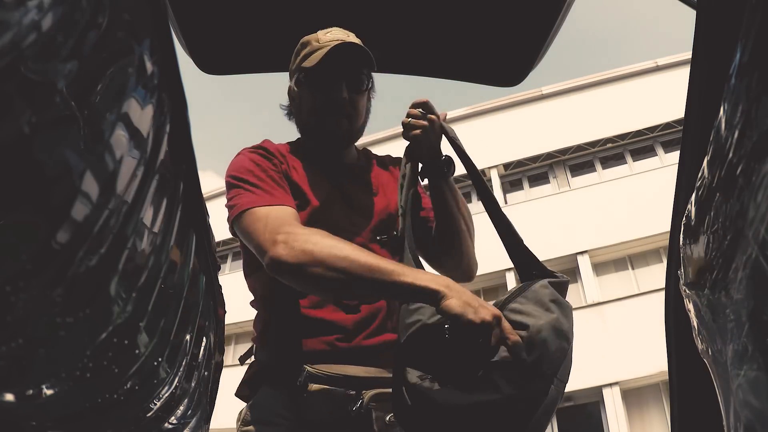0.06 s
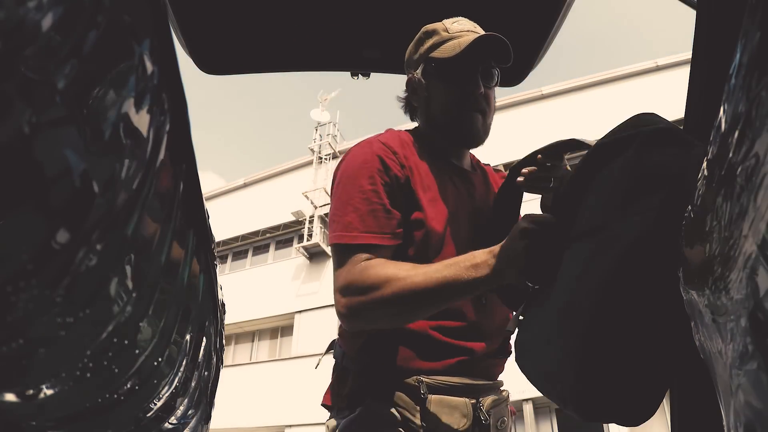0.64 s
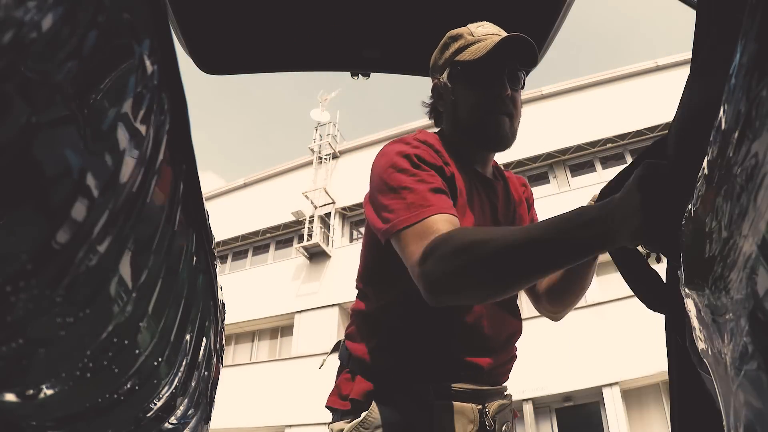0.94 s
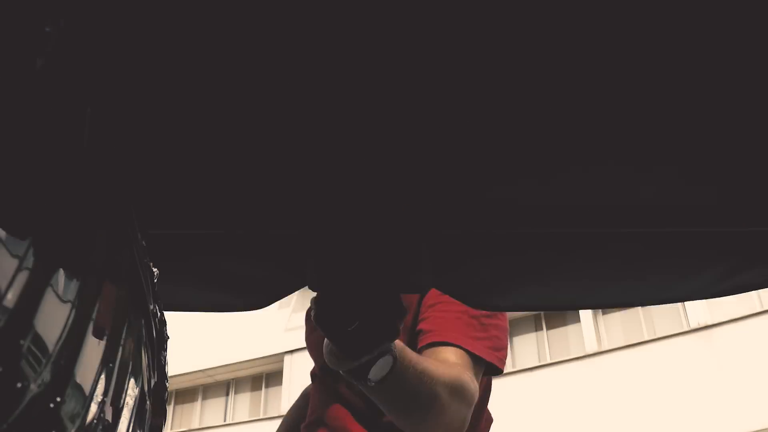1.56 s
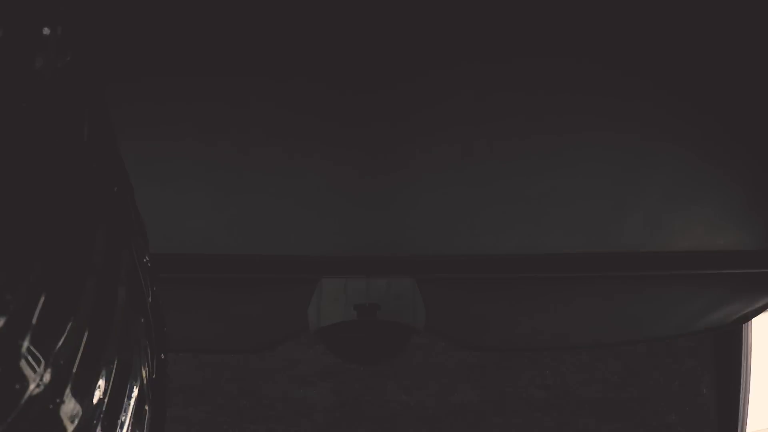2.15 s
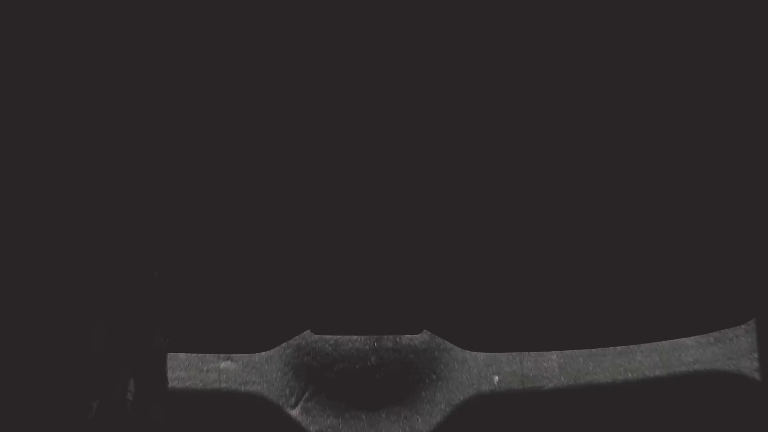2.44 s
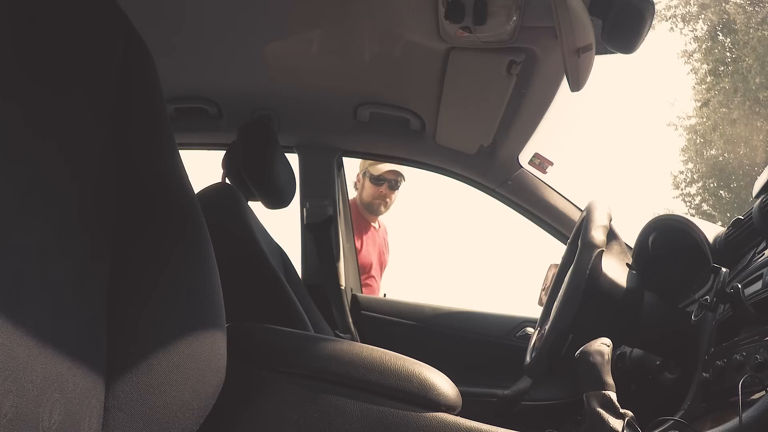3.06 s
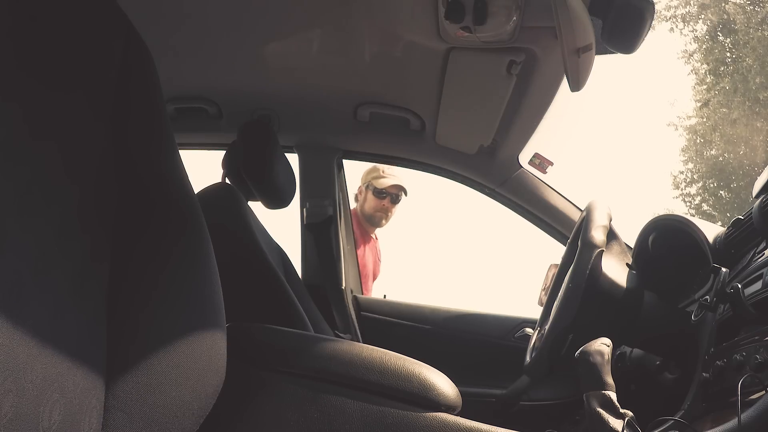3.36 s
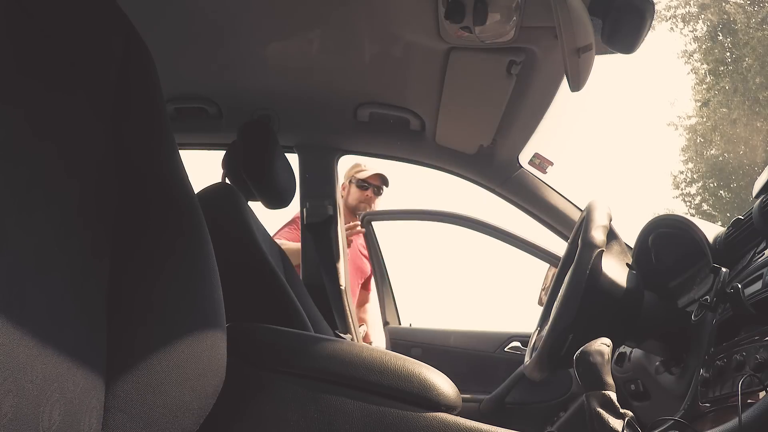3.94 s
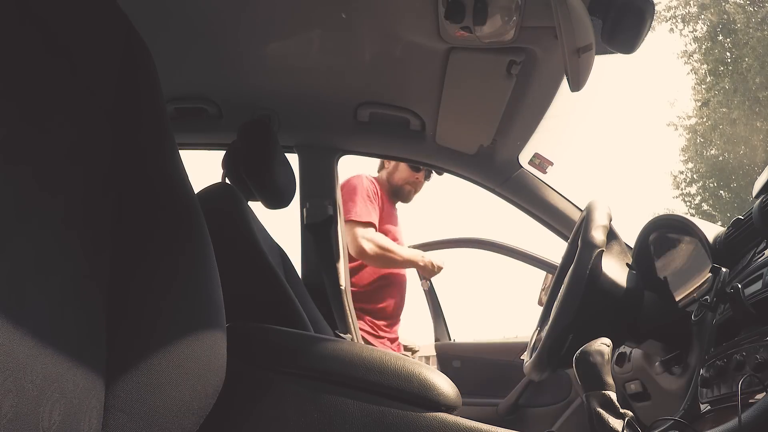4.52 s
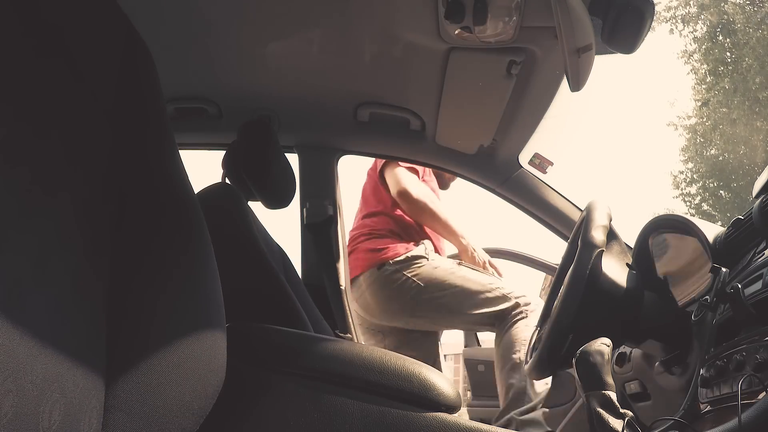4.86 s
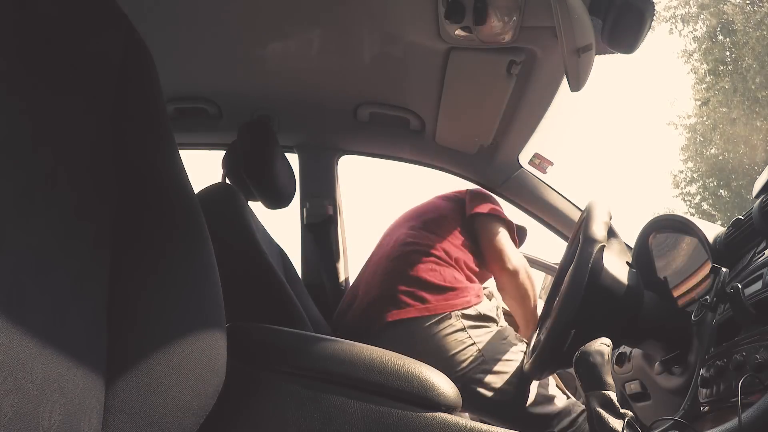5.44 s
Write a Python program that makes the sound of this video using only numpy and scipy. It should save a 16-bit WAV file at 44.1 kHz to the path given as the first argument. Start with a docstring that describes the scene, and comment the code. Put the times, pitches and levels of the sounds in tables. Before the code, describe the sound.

A bag bumps into a boot and the lid thumps shut; from inside, the car door unlatches and someone slides onto the seat.

```python
"""Loading a car and climbing in

A nylon bag with jingling zip pulls is swung into the boot; the lid judders down, clacks and slams.
Then, heard from inside the cabin, the driver's door is unlatched and swung open and the driver climbs
in, with soft thumps, clicks of trim and cloth sliding on the seat. Friction makes the rustles; impacts
make noise bursts and excite the damped modes of pulls, panels and shell; the body rocks on its springs."""
import sys
import numpy as np
from scipy import signal
from scipy.io import wavfile
from scipy.ndimage import uniform_filter1d

SR = 44100
rng = np.random.default_rng(int(sys.argv[2]) if len(sys.argv) > 2 else 0)


def to_wav(s):
    """Save 16-bit WAV."""
    ch = np.atleast_2d(s).T  # columns
    pcm = np.round(np.clip(ch, -1, 1) * 32767)  # PCM
    wavfile.write(sys.argv[1], SR, pcm.astype(np.int16))


N = 246519
TIME = np.arange(N) / SR
PULL_FROM_S, PULL_TO_S = 1.3, 1.77  # the lid gathers speed
CABIN_FROM_S, AJAR_FROM_S = 2.716, 3.3

# Spectra of the background and of the body's vibration: f/Hz, relative spectral level/dB
STREET_SPECTRUM = [(59, -45.5), (100, 3.5), (134, -7), (159, -8.5), (438, -12.5), (530, -17), (601, -2),
                   (774, -6.5), (977, -12.5), (2090, -28), (3390, -26), (15500, -46)]
CABIN_SPECTRUM = [(59, -1), (100, -11), (188, -48), (223, -8.5), (654, -19), (6000, -26), (8230, -35),
                  (14200, -39), (15500, -59)]
ROCKING_SPECTRUM = [(8.8, -39), (15, 3), (27, 2), (48, -7), (61, -2), (102, -18), (172, -24), (200, -40),
                    (260, -58.5), (440, -120)]
SHAKE_SPECTRUM = [(8.8, -30), (15, -5.5), (27, 2), (43, 1.5), (75, -11.5), (97, -8.5), (166, -27),
                  (203, -34), (220, -31), (290, -50), (480, -120)]
# Spectra of sliding friction: f/Hz, relative spectral level/dB
CLOTH_SPECTRUM = [(88, -45), (150, -2.5), (320, -7), (453, -7.5), (561, -9.5), (643, -13.5), (766, -20.5),
                  (1060, -8.5), (1510, -14.5), (2410, -23), (5990, -25), (7560, -36), (15500, -44)]
SEAT_SPECTRUM = [(1470, -38), (2500, -3.5), (2930, -13), (3830, -9), (6010, 2.5), (7450, -14.5),
                 (9730, -16), (11200, -25), (15500, -28)]
NYLON_RUSTLE_SPECTRUM = [(120, -33), (200, -4), (314, -20), (385, -8.5), (477, -13.5), (603, -3),
                         (945, -4.5), (1160, -7.5), (2300, -20), (2990, -48), (5060, -120)]
NYLON_HISS_SPECTRUM = [(1350, -34), (2300, -4), (3540, -4.5), (4190, -2), (4830, -9.5), (5950, -5),
                       (7560, -19.5), (15500, -27.5)]
JUDDER_SPECTRUM = [(71, -22), (120, -3), (166, -10), (204, -7), (279, -14), (598, -11.5), (771, -17),
                   (1120, -26), (1280, -22), (1440, -28), (1900, -40), (2470, -64), (4180, -120)]
STRUT_SPECTRUM = [(1120, -23.5), (1900, -6), (2410, 1), (2800, -2), (3800, -1), (6380, -10.5),
                  (7950, -26.5), (14200, -33.5), (15500, -35)]
# Spectra of impacts: f/Hz, relative spectral level/dB
SCUFF_SPECTRUM = [(88, -28.5), (150, 0), (324, 5), (687, -23.5), (1310, -14.5), (2260, -30), (2530, -29),
                  (2870, -29.5), (3710, -37), (4460, -29), (12000, -58), (15600, -77), (22000, -120)]
BUMP_SPECTRUM = [(59, -30), (100, -1.5), (355, -15.5), (614, -4.5), (977, 3.5), (1550, -13), (2470, -22),
                 (2690, -27), (8410, -36.5), (9540, -49), (10800, -57), (15500, -44)]
BUCKLE_SPECTRUM = [(120, -7), (200, -28), (609, 2), (1290, 0), (2440, -15), (2700, -18), (3000, -25),
                   (4840, -38), (8090, -45), (12000, -60), (15600, -88), (22000, -120)]
DOOR_SPECTRUM = [(59, -24.5), (100, 6.5), (173, -1), (347, -14.5), (438, -9.5), (564, -22.5), (682, -21),
                 (791, -31), (1060, -15.5), (1430, -19.5), (2420, -37), (3250, -38.5), (3930, -42),
                 (4560, -37), (15500, -77)]
LID_SPECTRUM = [(59, -26), (100, -0.5), (173, -8.5), (347, -20.5), (614, -9.5), (808, -19.5), (1110, -15),
                (1840, -30.5), (2040, -33), (3850, -31.5), (4370, -39.5), (5170, -29.5), (7890, -46.5),
                (10800, -47), (15500, -52.5)]

# Jolts that set the body rocking on its springs: t/s, level/dB, T60/s
BODY_JOLTS = [(1.19, -26.5, .7), (2.13, -37, 0.54), (2.56, -13, 0.38), (3.48, -23.5, 1.83), (5.42, -31, 2)]
# Two dry clicks where the sound cuts abruptly: t/s, peak level/dB
CUT_CLICKS = [(1.2979, -18), (2.7153, -25.5)]
# Booms of the shell, its panels and the enclosed air: t/s, peak level/dB, f/Hz, rise time/s, T60/s
SHELL_BOOMS = [(1.152, -15.5, 57, 0.0062, 0.31), (1.774, -3.5, 41.7, 0.027, 0.16),
               (1.777, -8.5, 146.6, 0.0037, 0.099), (1.802, -7, 77.3, .0035, .076),
               (1.826, -8, 106, 0.0029, 0.093), (2.504, -12.5, 77.8, .0074, 0.39),
               (2.527, -2.5, 40.9, .022, .17), (2.535, -28, 720, .003, 0.47),
               (2.658, -10, 39.3, .0045, 0.11), (3.39, 2, 46.2, 0.002, .13),
               (3.391, -10, 160.5, 0.00085, 0.081), (3.444, -6.5, 38, .011, 0.12),
               (3.755, -16.5, 92.9, .0045, 0.39), (4.08, -22.5, 46.3, 0.014, 0.79),
               (4.335, -14, 61.7, 0.0055, 0.25), (4.587, -17.5, 59, 0.0072, 0.18),
               (5.331, -8, 91.8, 0.044, .12), (5.581, -10, 222, 0.0064, 0.09)]
# Zip pulls striking each other: t/s, level/dB
ZIP_TOUCHES = [(.095, -38.5), (.175, -45), (.204, -39.5), (.328, -53), (.565, -57), (.70, -56),
               (.747, -55.5)]
# Rubbing strokes: start t/s, peak t/s, peak level/dB, swell/dB, release T60/s
CLOTH_STROKES = [(3.325, 3.97, -52, 6, 3.5), (4.27, 4.93, -48, 16.5, 1.9), (5.095, 5.52, -50.5, 5.5, 3)]  # clothes brushing the door, then climbing in
BAG_STROKES = [(0, 0.218, -32.5, 4.5, 1.99), (0.736, 0.909, -48.5, 5, 2.5)]  # bag along the boot lining
# Impacts: t/s, knock level/dB, hardness/dB, T60/s
DRIVER_SCUFFS = [(4.215, -39.5, -5, 0.11), (4.307, -35.5, -16.5, 0.22), (4.493, -30, 7, 0.16),
                 (4.529, -28, 16.5, 0.089), (4.564, -33.5, -13, 0.056), (4.984, -39, 15, .058),
                 (5.128, -37.5, 21.5, 0.17), (5.174, -35, 10, 0.058), (5.227, -34, -12.5, 0.047),
                 (5.33, -20.5, -3, 0.053), (5.344, -23, -4, .05), (5.379, -28, -3, 0.061),
                 (5.579, -19.5, -16, 0.05)]  # shoes and limbs on sill, floor and seat
BAG_BUMPS = [(.078, -12.5, 8, 0.076), (.093, -10.5, -8.5, 0.036), (.112, -15, 9.5, 0.044),
             (.137, -11.5, 3.5, .031), (.174, -16.5, 5, .034), (.22, -15.5, 2, 0.063),
             (.954, -37.5, -14.5, 0.033)]  # bag and its load
BUCKLE_TAPS = [(.044, -26, -2, 0.024), (.337, -30.5, 2, .022), (.5165, -25, 10, 0.026),
               (.671, -24.5, -24, 0.017)]  # buckles on the boot trim
DOOR_IMPACTS = [(2.945, -42.5, 8.5, 0.046), (3.162, -31, 5.5, 0.054), (3.301, -38, -1, .09),
                (3.329, -21.5, -5.5, 0.19), (3.339, -21, 6, 0.066), (3.367, -35, -14, .07),
                (3.392, -10.5, -6, 0.079), (3.438, -22, 8.5, 0.041), (3.503, -20.5, -14, 0.048),
                (3.561, -29.5, -23, 0.053), (3.589, -31, -21, 0.045), (3.738, -22, 7.5, 0.092),
                (3.751, -7, 3, .12), (3.771, -19, -1, 0.077), (3.834, -28.5, -2, 0.25),
                (4.06, -24, -0.5, 0.013), (4.406, -46.5, 30, .041), (4.544, -29, 10, 0.052),
                (4.943, -28, 2.5, 0.06), (5.101, -24, 5, 0.037)]  # handle, latch, stay and trim; at 4.94 s a brush of clothing
LID_IMPACTS = [(1.121, -27.5, -7, 0.16), (1.158, -23.5, -3.5, 0.22), (1.188, -23.5, -15, .04),
               (1.24, -26.5, 18, 0.038), (1.246, -17, 13.5, 0.068), (1.509, -22.5, -19, 0.065),
               (1.68, -16, -16, 0.033), (1.78, -8.5, 13, 0.078), (1.808, -6.5, 10.5, .04),
               (1.858, -31.5, 5, .067), (2.045, -28, -21, 0.11), (2.48, -27.5, 0, 0.084),
               (2.497, -7, 7, 0.083), (2.53, -15.5, 7, 0.073), (2.535, -8, 4, .11), (2.551, -8, 2, 0.031),
               (2.667, -22.5, 19, .077)]  # boot lid and latch
# Latch rebounds after the slam, one per swing of the panel: t/s, knock level/dB, hardness/dB, T60/s
LATCH_RATTLE = [(2.561 + k * .025, -15 - k * 4, 3.5, 0.18) for k in range(4)]
# Normal modes: f/Hz, relative level/dB, T60/s
ZIP_PULL_MODES = [(8300, -4, .05), (8590, -6, .05), (10690, -3, .085), (10950, -7, .05), (13630, -4, .075)]
DOOR_CABIN_MODES = [(162, 3.5, 0.054), (293, -1, 0.12), (363.6, -7.5, 0.19), (449.4, -9.5, 0.24),
                    (1146, -7.5, 0.089), (1310, -26, 0.033), (1355, 4, 0.026), (1740, -18.5, 0.013),
                    (3060, -23, 0.017), (3704, -3, .05), (4430, -21, 0.027), (5210, -3.5, 0.078)]
LID_LATCH_MODES = [(147.2, 2.5, 0.21), (244, -6.5, 0.22), (630, -17, 0.16), (738, -13, 0.14),
                   (861, -9, 0.11), (975, -10.5, 0.12), (1077, -9.5, 0.081), (1252, -13, 0.096),
                   (1508, -14.5, 0.063), (1712, -13.5, 0.045), (2050, -14.5, 0.046), (3550, -8.5, .04),
                   (3710, 0, 0.034), (4040, -4, .04), (5480, -11.5, 0.0297)]
# Thud, knock and tick bands of an impact: lower f/Hz, upper f/Hz
BANDS = [(100, 450), (450, 2500), (2500, 16000)]


def gain_of(db):
    """Amplitude ratio: a factor of ten per 20 dB."""
    return 10 ** (np.asarray(db) / 20)


def unit_rms(x):
    """Normalisation to unit mean power."""
    return x / np.sqrt(np.mean(x ** 2) + 1e-20)


def decay(t, t60):
    """Exponential free decay, 60 dB in t60 seconds."""
    return np.exp(-np.log(1000) * t / max(t60, 1e-3))


def add(mix, start, sound):
    """Linear superposition of a sound from its start time."""
    part = mix[max(round(start * SR), 0):][:len(sound)]
    part += sound[:len(part)]


def impulse_response(spectrum, size=8192):
    """Minimum-phase filter: the phase follows from the log magnitude by the Hilbert transform."""
    hz = abs(np.fft.fftfreq(size, 1 / SR))
    knot_hz, knot_db = np.transpose(spectrum)
    db = np.interp(np.log(hz + 1), np.log(knot_hz), knot_db)
    log_gain = np.log(gain_of(np.maximum(db, -100)))
    return np.fft.ifft(np.exp(np.conj(signal.hilbert(log_gain)))).real[:size // 2]


def coloured(drive, spectrum):
    """Source-filter model: convolution imposes a spectrum on the drive, at unit rms."""
    return unit_rms(signal.oaconvolve(drive, impulse_response(spectrum))[:N])


def rumble(spectrum):
    """Gain control: dividing noise by its running rms evens out its strength."""
    noise = coloured(rng.standard_normal(N), spectrum)
    return noise / np.sqrt(uniform_filter1d(noise ** 2, size=2500) + 1e-3)


def stroke(start, top, db, swell_db, t60):
    """Envelope of a movement: quick onset, growth linear in decibels, then free decay."""
    to_come = np.clip((top - TIME) / max(top - start, 1e-3), 0, 1)
    onset = decay(np.maximum(start - TIME, 0), .09)
    return gain_of(db - swell_db * to_come) * onset * decay(np.maximum(TIME - top, 0), t60)


def friction(spectrum, slips_per_s, spread_db, grain, wander_db):
    """Stick-slip friction: random slips over a smooth hiss, modulated by wandering contact pressure."""
    slips = (rng.random(N) < slips_per_s / SR) * rng.choice([-1, 1], N)
    slips = slips * gain_of(spread_db * np.minimum(rng.exponential(1, N), 3))
    pressure = unit_rms(uniform_filter1d(uniform_filter1d(rng.standard_normal(N), size=1000), size=500))
    drive = rng.standard_normal(N) + grain * unit_rms(slips)
    return coloured(drive * gain_of(wander_db * pressure), spectrum)


def split_bands(impacts, thud_loss, thud_growth):
    """Harder contact shifts energy from low thud to high tick; the thud's share also varies with force."""
    middling_db = -22
    blows = []
    for start, knock, hardness, t60 in impacts:
        thud = knock - 6.5 - thud_loss * hardness + thud_growth * (knock - middling_db)
        tick = knock - 20 + hardness
        blows.append((start, (thud, knock, tick), t60))
    return blows


def strikes(blows, spectrum, crack, rise_s, band_db, t60_ratios, tail_db, tail_t60):
    """Impact noise: an impulse (crack) and a dying chatter excite the thud, knock and tick bands."""
    out, t = np.zeros(N), np.arange(SR // 3) / SR
    body = impulse_response(spectrum)
    responses = [signal.sosfilt(signal.butter(3, band, "band", fs=SR, output="sos"), body)
                 for band in BANDS]
    contact = 1 - np.exp(-t / max(rise_s, 1e-4))  # soft contacts build up slowly
    tail = gain_of(tail_db) * decay(t, tail_t60)
    for start, levels, t60 in blows:
        for response, db, offset_db, ratio in zip(responses, levels, band_db, t60_ratios):
            drive = rng.standard_normal(len(t)) * contact * (decay(t, t60 * ratio) + tail)
            drive[0] += crack
            sound = signal.fftconvolve(drive, response)[:len(t)]
            add(out, start, gain_of(db + offset_db) * sound / np.std(sound[:SR // 50]))
    return out


def ringing(blows, modes, scatter_db):
    """Modal superposition: a blow excites each damped mode at about the level of that mode's band."""
    out, t = np.zeros(N), np.arange(SR // 3) / SR
    for hz, mode_db, t60 in modes:
        ring = decay(t, t60) * np.sin(2 * np.pi * hz * t)
        band = sum(hz >= lower for lower, _ in BANDS[1:])
        for start, levels, _ in blows:
            db = levels[band] + mode_db + scatter_db * rng.standard_normal()
            add(out, start, gain_of(db) * rng.choice([-1, 1]) * ring)
    return out


def ambience(spectrum, db):
    """Stationary background: filtered Gaussian noise."""
    return gain_of(db) * coloured(rng.standard_normal(N), spectrum)


def body_rumble():
    """Forced vibration: the sprung body rocks after each jolt, and the moving lid shakes it harder."""
    open_boot_db, shut_cabin_db, door_ajar_db = -40.5, -47, -36.5
    steady_db = np.select([TIME < CABIN_FROM_S, TIME < AJAR_FROM_S],
                          [open_boot_db, shut_cabin_db], door_ajar_db)
    steady = uniform_filter1d(gain_of(steady_db), size=2000)
    jolts = sum(stroke(start, start, db, 0, t60) for start, db, t60 in BODY_JOLTS)
    rocking = np.hypot(steady, jolts) * gain_of(3) * rumble(ROCKING_SPECTRUM)  # powers add
    shake = stroke(PULL_FROM_S, PULL_TO_S, db=-13, swell_db=11, t60=0.069) * rumble(SHAKE_SPECTRUM)
    return rocking + shake


def cut_clicks():
    """Broadband transients: two dry clicks, each a jump that decays, where the sound cuts abruptly."""
    out, t = np.zeros(N), np.arange(SR // 20) / SR
    for start, db in CUT_CLICKS:
        add(out, start, gain_of(db) * decay(t, 0.011))
    return out


def shell_booms(rows):
    """Resonance: a push on the shell swells into a hollow ring, which damping removes."""
    out, t = np.zeros(N), np.arange(SR // 2) / SR
    for start, db, hz, rise, t60 in rows:
        swell = (1 - np.exp(-t / max(rise, 1e-3))) ** 2 * decay(t, t60)
        add(out, start, gain_of(db) * swell / swell.max() * np.sin(2 * np.pi * hz * t))
    return out


def driver():
    """Soft impact and friction: shoes scuff, and clothes rustle and slide over the seat."""
    blows = split_bands(DRIVER_SCUFFS, thud_loss=.45, thud_growth=-0.22)
    scuffs = strikes(blows, SCUFF_SPECTRUM, crack=0, rise_s=0.0025, band_db=(-3.5, -13, -15),
                     t60_ratios=(1, 1, 1), tail_db=-22, tail_t60=0.21)
    rustle = friction(CLOTH_SPECTRUM, slips_per_s=160, spread_db=2.5, grain=.55, wander_db=1.5)
    rustle *= sum(stroke(*row) for row in CLOTH_STROKES)
    slide = friction(SEAT_SPECTRUM, slips_per_s=2300, spread_db=5, grain=0.38, wander_db=2)
    slide *= stroke(start=5.41, top=5.47, db=-50, swell_db=10, t60=0.97)
    return scuffs + rustle + slide


def zip_pulls():
    """Free vibration of small metal pulls: each touch and its weaker rebound excite the modes unevenly."""
    out, t = np.zeros(N), np.arange(SR // 5) / SR
    rebounds = [(start + 0.018, db - 12.5) for start, db in ZIP_TOUCHES]
    for start, db in ZIP_TOUCHES + rebounds:
        for hz, mode_db, t60 in ZIP_PULL_MODES:
            share, detune = rng.standard_normal(2)
            ring = decay(t, t60) * np.sin(2 * np.pi * hz * (1 + .009 * detune) * t)
            add(out, start, gain_of(db + mode_db + 2 * share) * ring)
    return out


def bag():
    """Friction and impact: nylon rubs on the boot lining while the load bumps and buckles tap."""
    rub = sum(stroke(*row) for row in BAG_STROKES)
    rustle = friction(NYLON_RUSTLE_SPECTRUM, slips_per_s=500, spread_db=3.5, grain=1.1, wander_db=1.5)
    rustle *= rub * gain_of(1)
    hiss = friction(NYLON_HISS_SPECTRUM, slips_per_s=3000, spread_db=5, grain=0.85, wander_db=2.35)
    hiss *= rub ** 1.314 * gain_of(2)  # harder rubbing sounds brighter
    soft_blows = split_bands(BAG_BUMPS, thud_loss=1, thud_growth=-0.12)
    bumps = strikes(soft_blows, BUMP_SPECTRUM, crack=0, rise_s=0.0032, band_db=(-12, -15, -11),
                    t60_ratios=(1.14, 1, 0.98), tail_db=-45, tail_t60=.1)
    hard_blows = split_bands(BUCKLE_TAPS, thud_loss=0.23, thud_growth=.3)
    buckles = strikes(hard_blows, BUCKLE_SPECTRUM, crack=11.6, rise_s=0.0001, band_db=(-8.5, -4, -4.5),
                      t60_ratios=(2.9, 1, 0.86), tail_db=-49, tail_t60=.08)
    return rustle + hiss + bumps + buckles


def door():
    """Damped impact: handle, latch and stay clack and excite the modes of door and padded cabin."""
    blows = split_bands(DOOR_IMPACTS, thud_loss=0.39, thud_growth=.15)
    clacks = strikes(blows, DOOR_SPECTRUM, crack=0.67, rise_s=0.003, band_db=(-6, -15, -6),
                     t60_ratios=(1.4, 1, 0.63), tail_db=-27.5, tail_t60=0.21)
    return clacks + gain_of(-9.5) * ringing(blows, DOOR_CABIN_MODES, scatter_db=0.5)


def boot_lid():
    """Friction, then impact: the lid judders down on hissing struts; latch and panel clatter and ring."""
    judder = friction(JUDDER_SPECTRUM, slips_per_s=220, spread_db=2, grain=0.68, wander_db=3)
    judder *= stroke(PULL_FROM_S, PULL_TO_S, db=-21.5, swell_db=14, t60=0.24)
    hiss = friction(STRUT_SPECTRUM, slips_per_s=2600, spread_db=1, grain=0.73, wander_db=3.2)
    hiss *= stroke(PULL_FROM_S, PULL_TO_S, db=-36.5, swell_db=20, t60=.13)
    blows = split_bands(LID_IMPACTS + LATCH_RATTLE, thud_loss=0.27, thud_growth=-0.144)
    clatter = strikes(blows, LID_SPECTRUM, crack=1.4, rise_s=0.00023, band_db=(-8, -13, -10),
                      t60_ratios=(2.86, 1, 0.51), tail_db=-26, tail_t60=0.098)
    return judder + hiss + clatter + gain_of(-7.5) * ringing(blows, LID_LATCH_MODES, scatter_db=-0.5)


def scene():
    """Superposition at two listening points: first by the boot, then abruptly inside the cabin."""
    street = ambience(STREET_SPECTRUM, db=-52)
    hush = ambience(CABIN_SPECTRUM, db=-63.5)
    boot_booms = shell_booms([row for row in SHELL_BOOMS if row[0] < CABIN_FROM_S])
    cabin_booms = shell_booms([row for row in SHELL_BOOMS if row[0] >= CABIN_FROM_S])
    boot = street + boot_booms + bag() + zip_pulls() + boot_lid()
    cabin = hush + cabin_booms + door() + driver()
    inside = uniform_filter1d((TIME >= CABIN_FROM_S) * 1., size=40)
    return ((1 - inside) * boot + inside * cabin + body_rumble() + cut_clicks())[None]


def record(dry):
    """Soft saturation rounds the heaviest booms at full scale; a low-pass filter limits the band."""
    rounded = dry / (1 + dry ** 6) ** (1 / 6)
    low_pass = signal.firwin(401, cutoff=15700, window=("kaiser", 8), fs=SR)
    return signal.oaconvolve(rounded, low_pass[None], "same")


dry = scene()
out = record(dry)
to_wav(out)
```